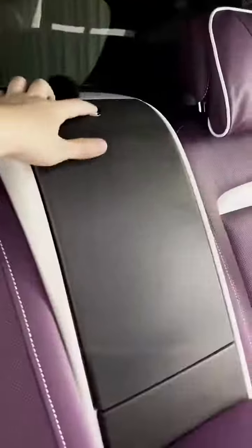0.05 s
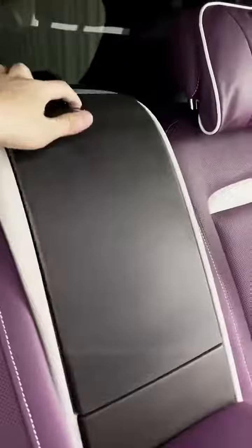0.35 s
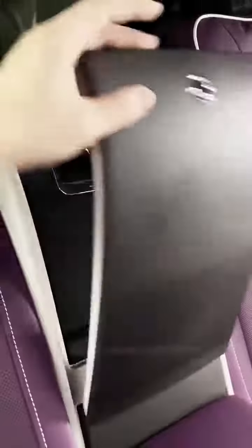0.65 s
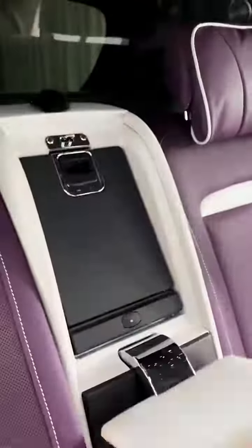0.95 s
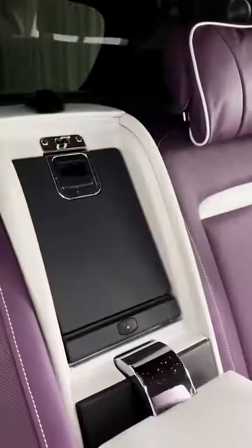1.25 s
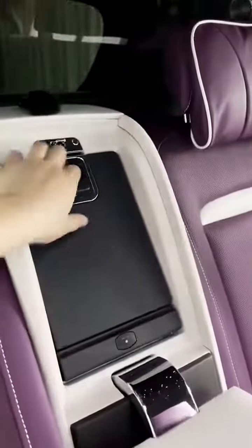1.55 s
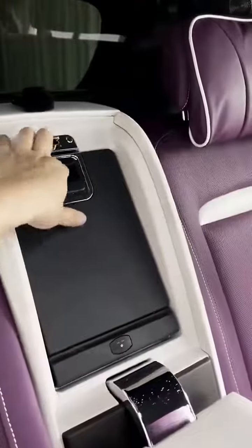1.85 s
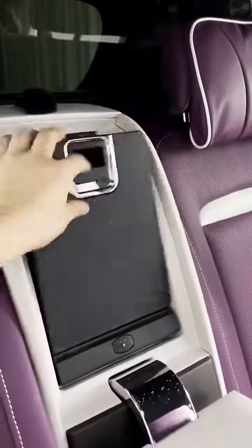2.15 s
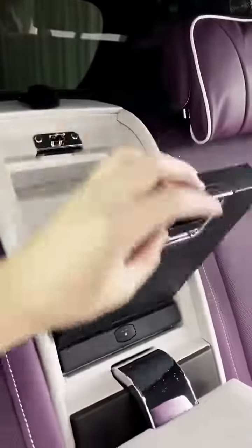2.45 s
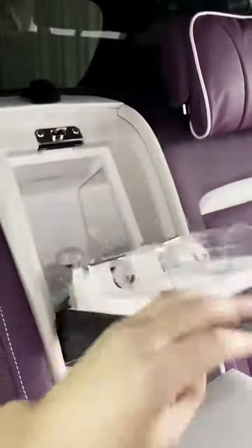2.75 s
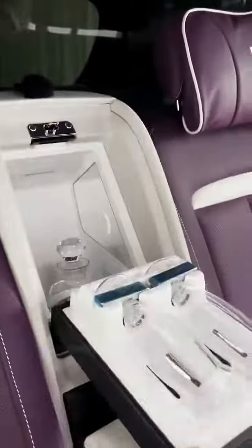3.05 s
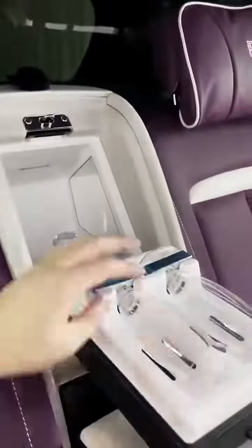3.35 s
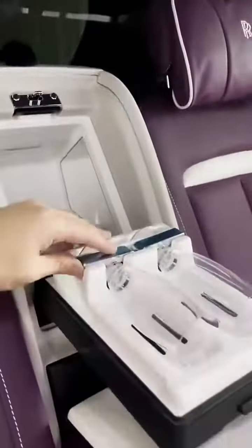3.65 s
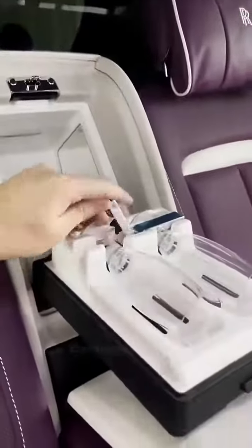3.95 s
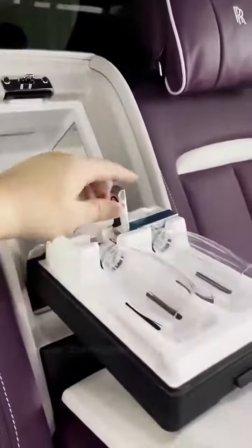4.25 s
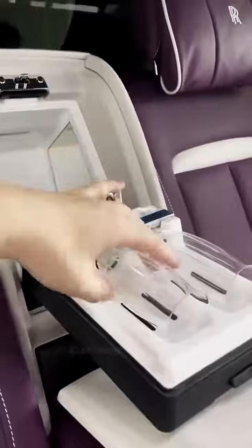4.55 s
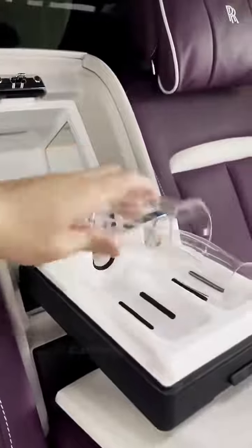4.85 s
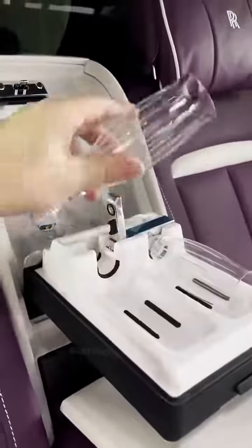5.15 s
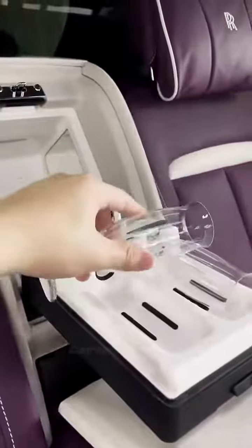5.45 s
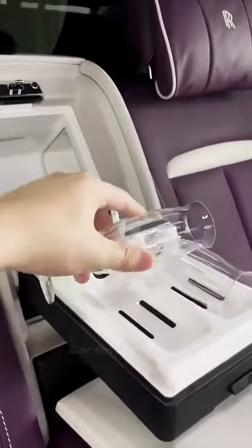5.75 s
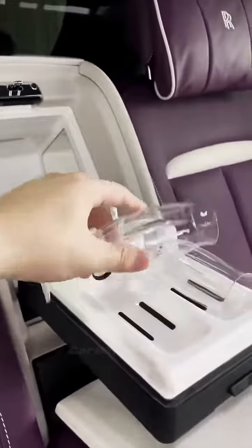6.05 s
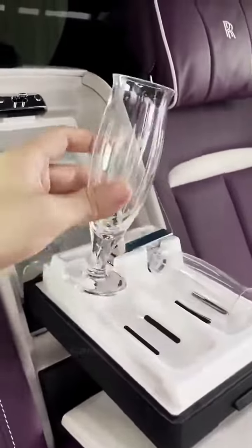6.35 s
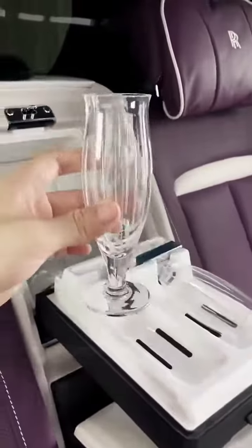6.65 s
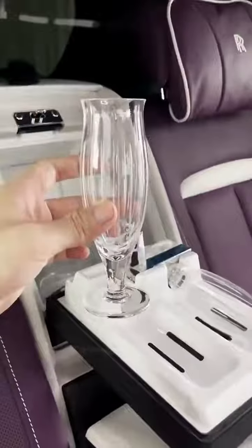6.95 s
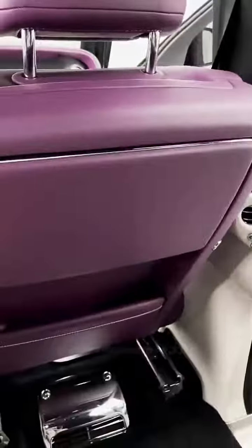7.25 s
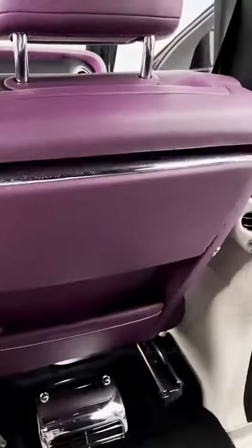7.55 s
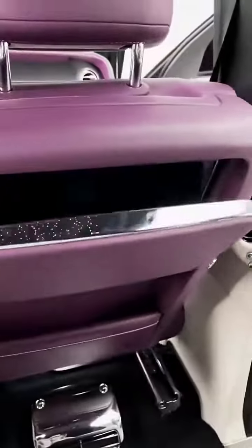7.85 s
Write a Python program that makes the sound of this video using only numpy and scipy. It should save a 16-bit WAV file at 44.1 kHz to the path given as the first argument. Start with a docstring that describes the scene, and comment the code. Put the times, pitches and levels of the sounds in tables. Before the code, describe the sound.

Latches snap and panels knock in a quiet car, then a crystal glass chatters, squeaks and clinks out of its holder and rings on.

```python
"""Clicks and soft rubs in a quiet car: a hand unlatches an armrest, folds down a drinks cabinet's lid
and frees a crystal flute. The flute chatters and squeaks against its holder, clinks on its neighbour
and is stood on the tray, where it rings on. Then the scene changes to a seat back, whose table starts
to open with soft bumps. Glass rings in decaying modes; blows and rubs are noise through resonant panels."""
import sys
import numpy as np
from scipy import signal
from scipy.fft import rfft, irfft, next_fast_len
from scipy.io import wavfile
from scipy.ndimage import uniform_filter1d

SR = 44100
rng = np.random.default_rng(int(sys.argv[2]) if len(sys.argv) > 2 else 0)


def log_audio(samples):
    """Write samples as a 16-bit WAV file to the path given in sys.argv[1]."""
    # one column per channel
    frames = np.atleast_2d(samples).T
    # limit to full scale, then quantise
    limited = np.clip(frames, -1, 1)
    pcm = np.round(limited * 32767).astype(np.int16)
    wavfile.write(sys.argv[1], SR, pcm)


N = 352359
TIME = np.arange(N) / SR
SHORT = TIME[:SR // 3]
CHANGE_S = 7.31  # cabinet scene ends, seat-back scene starts


def chatter(taps_per_s=340, spread_db=4, contact_db=-7, contact_t60_s=.042, tail_db=-15, tail_t60_s=.13):
    """The flute skips along its holder: a first touch, then quick taps that tick and ring its modes."""
    # tap runs: (start [s], length [s], level [dB], fade over the run [dB], first touch re run [dB])
    runs = [(5.703, 0.034, -27.5, -3.5, 12), (5.747, 0.015, -33, 8, -3), (5.801, 0.017, -47, 11, -2.5),
            (5.943, 0.068, -25.5, 0.5, 12.5), (5.9511, 0.0109, -24.5, 0.5, 8),
            (5.996, 0.044, -36, 12, -15.5), (6.193, 0.075, -22, 16.5, 8.5)]
    # flute pressed on the holder: (mode [Hz], level [dB], t60 [s])
    held_modes = [(275.5, -8, 0.17), (568, -8, 0.074), (711, -20.5, 0.065), (1615, -0.5, 0.067),
                  (1620, -22.5, 0.064), (2087, -12, .08), (2310, -32.5, 0.0587), (3502, -13.5, 0.29),
                  (3540, -10, 0.23), (4150, -5.5, 0.18), (4340, -6, 0.15), (6200, -8, 0.1),
                  (6550, -6, 0.19), (6554, 7.5, 0.0569), (6824, 1.5, 0.1), (7300, -18, .08),
                  (7600, -8, 0.079), (7800, -12, 0.089), (8435, -3.5, 0.11), (8730, -15.5, 0.12),
                  (9160, -16, 0.047), (10500, -15, .1), (10700, -7.5, .07), (11040, -14, 0.08),
                  (11850, -37, .08)]
    # contact tick spectrum: (frequency [Hz], density [dB])
    tick_spectrum = [(120, -35.5), (250, -2.5), (1000, -7), (2200, 10), (3100, -1), (4400, 5.5), (5600, -9),
                     (7000, 13), (9000, -17), (12000, -1), (15000, -21)]
    out = np.zeros(N)
    cabin_tail = amp(tail_db) * decay(SHORT, tail_t60_s)
    tick_power = decay(SHORT, contact_t60_s) ** 2 + cabin_tail ** 2
    for start_s, length_s, db, fade_db, touch_db in runs:
        tap_s = np.arange(0, length_s, 1 / taps_per_s)
        tap_s[1:] += rng.uniform(-.54, .5, len(tap_s) - 1) / taps_per_s
        force = amp(spread_db * rng.standard_normal(len(tap_s)) - fade_db * tap_s / length_s)
        force[0] = amp(touch_db)
        taps, tone = np.zeros((2, len(SHORT)))
        np.add.at(taps, (tap_s * SR).astype(int), force)
        for hz, mode_db, t60_s in held_modes:
            mode = signal.fftconvolve(taps, ring([(hz, 0, t60_s)], SHORT))[:len(taps)]
            tone += amp(mode_db) * np.sqrt(t60_s) * unit(mode)
        bursts = np.sqrt(abs(signal.fftconvolve(taps ** 2, tick_power)[:len(taps)]))
        ticks = bursts * colour(rng.standard_normal(len(taps)), tick_spectrum)
        add(out, start_s, amp(db) * crest(unit(tone) + amp(contact_db) * unit(ticks), size=800))
    return out


def crystal(clink_s=5.7482, clink_db=-19.5, jolt_s=2.672, jolt_db=-50, nudge_rise_s=.0029):
    """Glass rings freely after a clink, the lid's jolt or a nudge; the bowl's lowest two modes beat."""
    # clink on the neighbouring glass: (mode [Hz], level [dB], t60 [s])
    clink_modes = [(2330, -9, 0.093), (4475, 6.5, 0.064), (4800, -2, .06), (4500, -3, 0.17),
                   (5140, -2, 0.033), (6260, 4, 0.051), (6400, 3.5, 0.047), (6700, 9, 0.052),
                   (6500, 6.5, 0.075), (7600, -1.5, .08), (8400, -17, 0.083), (8800, 1.5, 0.056),
                   (9800, -6.5, .067), (9500, -4, .06), (11160, -14, 0.099), (12190, -13, 0.059),
                   (12200, -12.5, 0.081), (13850, -15, 0.055)]
    # stowed glasses, shaken as the lid hits its stop: (mode [Hz], level [dB], t60 [s])
    stowed_modes = [(1572, -14, .35), (3510, -7, .3), (4102, -12, .45), (4231, -4, .25), (5362, -11, .18),
                    (8129, -13, .38)]
    # finger nudges on the flute: (time [s], level [dB])
    nudges = [(4.669, -54.5), (4.702, -58.5), (4.777, -65.5), (5.33, -68), (5.355, -69)]
    # nudged flute: (mode [Hz], level [dB], t60 [s])
    nudge_modes = [(4324, -9, 0.14), (6720, -8, 0.072), (7410, -1, 0.064), (7530, -3.5, 0.092),
                   (8240, -13.5, 0.092), (9400, -6.5, 0.1), (10590, -8, 0.063), (11850, -13, .07),
                   (12920, -16, 0.077)]
    # free bowl: (mode [Hz], level [dB], t60 [s])
    bowl_modes = [(1473, -47, 3.3), (1484, -57, 3.0), (1612, -43, .42), (3494, -56, .3), (4102, -27, .55),
                  (4360, -46, .45), (6550, -57, .42), (8400, -61, .38)]
    # bowl onsets: (time [s], gain of the low modes [dB], gain of the upper modes [dB],
    # grip factor on t60 [1], swell [s], sharpening by the grip [Hz])
    onsets = [(5.748, -6, -3, .65, .002, 13), (5.99, -3, -24, .6, .01, 4), (6.2, 1, -18, 1.0, .02, 0),
              (6.266, -30, 15.5, .7, .3, 0)]
    out, t = np.zeros(N), TIME[:2 * SR]
    add(out, clink_s, amp(clink_db) * crest(ring(clink_modes, SHORT)))
    add(out, jolt_s, amp(jolt_db) * ring(stowed_modes, t))
    for start_s, db in nudges:
        add(out, start_s, amp(db) * ring(nudge_modes, SHORT) * rise(SHORT, nudge_rise_s))
    split_hz = 2 * bowl_modes[0][0]
    for start_s, low_db, upper_db, grip, swell_s, shift_hz in onsets:
        modes = [(hz + shift_hz, db + (upper_db if hz > split_hz else low_db), t60_s * grip)
                 for hz, db, t60_s in bowl_modes]
        add(out, start_s, ring(modes, t) * rise(t, swell_s))
    return out * (TIME < CHANGE_S)


def squeaks(start_hz=1596, climb_hz=210, bend=2.05, waver=.012, fade_db=7):
    """Glass sticks and slips on the holder: a thin tone that bends up as the pressure eases."""
    # drags: (start [s], length [s], level [dB])
    drags = [(5.7, 0.048, -33), (5.938, 0.061, -34), (6.205, 0.071, -45)]
    out = np.zeros(N)
    for start_s, length_s, db in drags:
        progress = np.linspace(0, 1, int(length_s * SR))
        wobble = unit(uniform_filter1d(rng.standard_normal(len(progress)), size=80))
        hz = (start_hz + climb_hz * progress ** bend) * (1 + waver * wobble)
        envelope = amp(db - fade_db * progress) * signal.windows.tukey(len(progress), .25)
        add(out, start_s, envelope * unit(np.sin(2 * np.pi * np.cumsum(hz) / SR)))
    return out


def knocks(tail_db=-30, tail_factor=3.7, body_db=8, fitting_db=5, bass_order=4, treble_order=3):
    """Each blow cracks, dies fastest in the treble, rings its part and the panels, and leaves a tail."""
    # latches, lids, clips and the flute's foot; small parts lack bass, soft contacts lack treble:
    # (time [s], level [dB], bass corner [Hz], treble corner [Hz], t60 factor [1],
    # body resonance [Hz], fitting resonance [Hz])
    blows = [(0.282, -28.0, 5200.0, 6000.0, 0.69, 1300.0, 4400),
             (0.292, -44.0, 1120, 3840, 0.49, 1340, 2100.0), (0.349, -12, 1190, 9200, 0.55, 600, 3400),
             (0.486, -54.5, 172, 13740, 0.21, 580.0, 2410.0), (0.523, -49.0, 415, 3000.0, 0.22, 630, 2250),
             (0.553, -52, 396, 5200.0, 3, 627.0, 1660), (0.5841, -29, 540, 4400.0, 0.24, 430, 2790),
             (0.603, -42.5, 990.0, 2600.0, 0.79, 400.0, 2360.0),
             (0.6444, -57.5, 750.0, 7150, 0.29, 584, 2250.0), (0.727, -31.5, 744, 750.0, 0.48, 830, 1500.0),
             (1.99, -50, 370.0, 6000.0, 0.8, 1280, 3430), (2.015, -52, 1300.0, 950.0, 0.36, 1130.0, 2640),
             (2.028, -53.5, 560, 3230, 0.83, 640, 3600.0), (2.198, -38.5, 912, 1090, 0.48, 840, 1440),
             (2.381, -30, 800.0, 2480, 0.76, 1080, 2720), (2.6693, -23, 760, 5680, 1.14, 588, 3200.0),
             (2.6737, -27.5, 650.0, 10000.0, 1.2, 588, 3500),
             (2.742, -48.5, 97.5, 1800.0, 0.7, 585, 1555.0), (2.76, -50.5, 370.0, 2390, 2.3, 580.0, 1600),
             (3.271, -49, 100.6, 994, 0.85, 576.0, 1504.0), (3.447, -39.5, 565, 1900.0, 0.65, 573, 1770),
             (4.0583, -40, 1220, 876, 1.7, 533, 1710.0), (4.176, -42, 568, 1515, 0.65, 1040, 2630.0),
             (4.3022, -28, 635, 7000.0, 0.8, 530.0, 4980), (4.346, -57.0, 300.0, 9440, 0.87, 715.0, 2820),
             (4.4962, -55.0, 330.0, 3210, 0.95, 550.0, 2060), (4.527, -51, 530.0, 440.0, 0.78, 566, 3510),
             (4.9668, -39.5, 750.0, 695, 1.26, 550, 2050), (5.002, -35.0, 490.0, 2930, 0.93, 587, 2130),
             (5.125, -52.0, 329, 2370, 2.3, 522, 1990.0), (6.194, -24, 353, 14000.0, 0.88, 750, 1620),
             (7.45, -34.5, 248, 380.0, 0.58, 500, 1870), (7.49, -43, 100.0, 650.0, 0.48, 444.0, 1550.0),
             (7.514, -55.0, 233, 6450, 2.7, 744.0, 2660.0), (7.593, -41.5, 100.0, 862, 0.25, 384, 1550),
             (7.727, -48.0, 370.0, 5620, 3.2, 537, 5300), (7.899, -53, 490.0, 10000.0, 1.2, 426.0, 4620)]
    # decay in the trim: (low edge [Hz], high edge [Hz], gain [dB], rise [s], t60 [s])
    bands = [(178, 400, 4.5, 0.006, 0.076), (397, 1200, -0.6, 0.0004, 0.07),
             (1106, 2800, -2.3, 0.0012, 0.034), (2970, 6500, -1.83, 0.00019, .027),
             (6000, 12000, -6.5, 0.00013, 0.018)]
    out, t = np.zeros(N), SHORT
    filters = [signal.butter(4, band[:2], "band", fs=SR, output="sos") for band in bands]
    mid_hz = np.array([np.sqrt(low_hz * high_hz) for low_hz, high_hz, *_ in bands])
    norm = np.sqrt(.01 * SR)  # energy of 10 ms at unit rms
    for start_s, db, bass_hz, treble_hz, t60_factor, body_hz, fitting_hz in blows:
        bass_loss = 1 + (bass_hz / mid_hz) ** bass_order
        treble_loss = 1 + (mid_hz / treble_hz) ** treble_order
        shares = 1 / np.sqrt(bass_loss * treble_loss)
        for sos, share, (_, _, band_db, rise_s, t60_s) in zip(filters, shares / shares.max(), bands):
            cabin_tail = amp(tail_db) * decay(t, t60_s * tail_factor)
            envelope = rise(t, rise_s) * (decay(t, t60_s * t60_factor) + cabin_tail)
            crack = signal.sosfilt(sos, rng.standard_normal(len(t)) * envelope)
            body = amp(body_db) * resonance(crack, body_hz, width_hz=85)
            fitting = amp(fitting_db) * resonance(crack, fitting_hz, width_hz=260)
            blow = cabinet(crack + body + fitting)
            add(out, start_s, share * amp(db + band_db) * norm * blow / np.linalg.norm(blow))
    return out


def rubs():
    """Grainy friction through the panels: broad scrapes, low shudders and thin chirps."""
    # fingers, catches and hinges rubbing: (start [s], length [s], level [dB], centre [Hz])
    scrapes = [(.3422, 0.018, -22.5, 3100), (1.875, 0.05, -54, 1960), (1.925, 0.072, -47, 833),
               (2.262, 0.037, -39.5, 1530), (2.296, 0.033, -51, 1840), (2.357, 0.032, -46.5, 1460),
               (2.398, 0.11, -57, 1760), (2.514, .038, -56.5, 1470), (3.045, 0.0207, -60, 1770),
               (3.134, 0.044, -55.5, 1510), (3.416, 0.033, -51.5, 1210), (4.06, 0.042, -52.5, 1760),
               (4.288, 0.012, -50, 1987), (4.966, 0.18, -62, 710), (5.041, 0.067, -69.5, 1960),
               (7.543, 0.037, -60, 2760), (7.691, 0.054, -54.5, 4230), (7.776, 0.044, -58, 3860)]
    # lids and panels moving or landing: (start [s], length [s], level [dB], centre [Hz])
    shudders = [(.351, .02, -28, 264.8), (.727, 0.024, -50, 190), (2.199, .22, -48.5, 137),
                (3.276, 0.044, -51, 202), (7.446, 0.025, -50, 350)]
    # tray hinge swinging out: (start [s], length [s], level [dB], centre [Hz])
    chirps = [(2.3, 0.015, -46, 3630), (2.41, 0.019, -52.5, 4960)]
    out = np.zeros(N)
    for rows, octaves, grain_db in (scrapes, .9, 5), (shudders, .52, 1.5), (chirps, .11, 0):
        for start_s, length_s, db, hz in rows:
            count = int(length_s * SR)
            friction = colour(grains(count, grain_db), hump(hz, octaves))
            friction *= signal.windows.tukey(count, .5)
            rub = cabinet(np.pad(friction, (0, SR // 10)))
            add(out, start_s, amp(db) * np.sqrt(count) * rub / np.linalg.norm(rub))
    return out


def creak(start_s=2.0718, length_s=.046, slips_per_s=235, db=-38, fade_db=13, jitter=.073, speed_up=.36):
    """A quickening run of slips rings the handle."""
    # handle resonances: (frequency [Hz], width [Hz], level [dB])
    handle = [(1270, 170, -8.5), (1540, 110, -7.5), (3040, 570, -10.5), (3070, 77, -5), (3730, 240, -14),
              (4930, 130, -14.5), (6600, 1700, -24.5)]
    out, slips = np.zeros(N), np.zeros(len(SHORT))
    slip_s = 0
    while slip_s < length_s:
        progress = slip_s / length_s
        slips[int(slip_s * SR)] = amp(2 * rng.standard_normal() - fade_db * progress)
        slip_s += (1 + jitter * rng.standard_normal()) / (slips_per_s * (1 + speed_up * progress))
    modes = [(hz, mode_db + 20 * np.log10(width_hz / handle[0][1]), np.log(1000) / np.pi / width_hz)
             for hz, width_hz, mode_db in handle]
    response = ring(modes, SHORT) * rise(SHORT, 1 / handle[-1][0])
    add(out, start_s, amp(db) * crest(cabinet(signal.fftconvolve(slips, response))))
    return out


def rattle(centre_hz=575, octaves=.2, grain_db=6):
    """The lowered tray buzzes on its hinge, dying down after the stop and growing until it seats."""
    # buzz envelope: (time [s], level [dB])
    contour = [(2.701, -66), (2.88, -76), (3.05, -59), (3.132, -56), (3.139, -42), (3.15, -36),
               (3.165, -60)]
    times_s, db = np.transpose(contour)
    envelope = np.interp(TIME, times_s, amp(db), left=0, right=0)
    return envelope * unit(colour(grains(N, grain_db), hump(centre_hz, octaves)))


def slides(attack_s=.016, release_t60_s=.13, grain_db=2, ticks_per_s=25, tick_db=-12, tick_t60_s=.015):
    """Skin and leather slide: fine hiss with tiny ticks, its level following each stroke's speed."""
    # strokes: (start [s], length [s], level [dB], change over the stroke [dB])
    strokes = [(0.047, 0.019, -60, -4.5), (0.121, 0.21, -64, -1.5), (0.69, 0.39, -60.5, -8),
               (1.422, 0.067, -66.5, 4.5), (1.755, 0.063, -57, -3.5), (1.863, 0.23, -56, -19),
               (2.226, 0.19, -69, 19.5), (2.413, 0.16, -62, -11), (2.58, 0.048, -63.5, -4.5),
               (2.637, 0.22, -64, -8.5), (2.92, 0.29, -76, 1.5), (7.679, 0.22, -71, 0)]
    # sliding spectrum: (frequency [Hz], density [dB])
    spectrum = [(500, -27), (1500, 7.5), (3000, 11.5), (6000, 4.5), (9000, 3), (12000, -6.5), (15000, -12)]
    speed, t = np.zeros(N), TIME[:SR]
    for start_s, length_s, db, change_db in strokes:
        held = amp(db + change_db * np.minimum(t / length_s, 1))
        release = decay(np.maximum(t - length_s, 0), release_t60_s)
        add(speed, start_s, np.minimum(t / attack_s, 1) * held * release)
    impulses = 1. * (rng.random(N) < ticks_per_s / SR)
    ticks = signal.oaconvolve(impulses, decay(SHORT, tick_t60_s))[:N] * rng.standard_normal(N)
    friction = unit(grains(N, grain_db)) + amp(tick_db) * unit(ticks)
    return speed * unit(colour(friction, spectrum))


def fidgets(taps_per_s=45, spread_db=3, tap_t60_s=.033, centre_hz=2200, octaves=.98):
    """Fingers and loose trim tap faintly at random, heard through the panels."""
    # spells of tapping: (start [s], length [s], level [dB])
    spells = [(0.497, .13, -55.5), (0.848, 0.36, -66), (1.881, 0.15, -59), (2.219, 0.27, -58),
              (2.949, .22, -63), (4.921, 0.25, -59)]
    out = np.zeros(N)
    for start_s, length_s, db in spells:
        for position, size in rng.random((int(length_s * taps_per_s) + 1, 2)):
            noise = colour(rng.standard_normal(len(SHORT)), hump(centre_hz, octaves))
            tap = crest(cabinet(noise * decay(SHORT, tap_t60_s)))
            add(out, start_s + position * length_s, amp(db + spread_db * (2 * size - 1)) * tap)
    return out


def cabin_air(cabinet_db=-54, seat_db=-51):
    """Low rumble and faint ventilation hiss, crossfaded between the two scenes."""
    # air at the cabinet: (frequency [Hz], density [dB])
    cabinet_spectrum = [(15, -50.5), (25, -19), (128, -0.5), (231, -3.5), (271, -3.5), (394, -18),
                        (573, -16.5), (621, -22.5), (691, -17.5), (879, -23.5), (1350, -23.5),
                        (1960, -32.5), (3350, -30.5), (5140, -41), (15000, -55)]
    # air at the seat back: (frequency [Hz], density [dB])
    seat_spectrum = [(15, -39.5), (25, -12), (202, 3), (278, -8), (427, -1.5), (604, -17.5), (749, -12),
                     (1150, -17.5), (2850, -26.5), (3180, -24.5), (4870, -36), (8550, -42), (15000, -56.5)]
    at_cabinet = amp(cabinet_db) * unit(colour(rng.standard_normal(N), cabinet_spectrum))
    at_seat = amp(seat_db) * unit(colour(rng.standard_normal(N), seat_spectrum))
    fade = uniform_filter1d(1. * (TIME > CHANGE_S), size=400)
    return at_cabinet * np.sqrt(abs(1 - fade)) + at_seat * np.sqrt(abs(fade))


def cabinet(x):
    """Adds the panels' resonances to whatever shakes them."""
    # padded panels and fittings: (frequency [Hz], width [Hz], gain [dB])
    panels = [(274, 32, 10.5), (422, 45, 6), (582, 70, 10), (738, 30, 5.5), (950, 69, 5), (1056, 84, 2),
              (1590, 70, 1), (1805, 70, 2), (2295, 60, 1), (2560, 100, 3), (3340, 130, 2), (3700, 130, -2),
              (5015, 120, 2), (8200, 400, 4)]
    return x + sum(amp(db) * resonance(x, hz, width_hz) for hz, width_hz, db in panels)


def resonance(x, hz, width_hz):
    """One resonance of unit gain."""
    return signal.lfilter(*signal.iirpeak(hz, hz / width_hz, fs=SR), x)


def ring(modes, t):
    """Sum of decaying sines at random phases."""
    return sum(amp(db) * decay(t, t60_s) * np.sin(2 * np.pi * (hz * t + rng.random()))
               for hz, db, t60_s in modes)


def grains(count, spread_db):
    """Noise of tiny, uneven slips."""
    noise = rng.standard_normal(count)
    flicker = unit(uniform_filter1d(rng.standard_normal(count), size=60))
    return noise * amp(spread_db * flicker)


def colour(x, points):
    """Filters by (frequency [Hz], gain [dB]) points."""
    hz, db = np.transpose(points)
    size = next_fast_len(len(x))
    bin_hz = np.fft.rfftfreq(size, 1 / SR)
    gain = amp(np.interp(np.log(bin_hz + 1), np.log(hz), db))
    return irfft(rfft(x, size) * gain, size)[:len(x)]


def hump(hz, octaves, skirt_db=17):
    """Rounded spectrum about hz, its points `octaves` apart."""
    return [(hz * 2 ** (k * octaves), -skirt_db * (abs(k) / 2) ** 2) for k in range(-4, 5)]


def rise(t, tau_s):
    """Exponential approach to one."""
    return 1 - np.exp(-t / tau_s)


def decay(t, t60_s):
    """Falls 60 dB in t60_s."""
    return np.exp(-np.log(1000) * t / t60_s)


def amp(db):
    """Decibels to gain."""
    return 10 ** (np.asarray(db) / 20)


def unit(x):
    """Scales to unit rms."""
    return x / np.sqrt(np.mean(x ** 2) + 1e-20)


def crest(x, size=160):
    """Scales the loudest stretch of `size` samples to unit rms."""
    return x / np.sqrt(uniform_filter1d(x ** 2, size).max() + 1e-20)


def add(mix, start_s, sound):
    """Mixes a sound in at start_s."""
    part = mix[max(round(start_s * SR), 0):][:len(sound)]
    part += sound[:len(part)]


def scene():
    """All sources, close up, in mono."""
    handling = knocks() + rubs() + rattle() + slides() + creak()
    glass = chatter() + squeaks() + crystal()
    return (handling + glass + cabin_air() + fidgets())[None]


def record(dry):
    """Soft clip of the loudest snap, then a low-pass."""
    ceiling, cutoff_hz = .9, 14550
    rounded = ceiling * np.tanh(dry / ceiling)
    lowpass = signal.firwin(255, cutoff_hz, window=("kaiser", 8), fs=SR)
    return signal.oaconvolve(rounded, lowpass[None], "same", axes=1)


dry = scene()
out = record(dry)
log_audio(out)
```